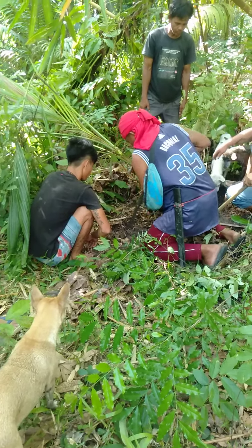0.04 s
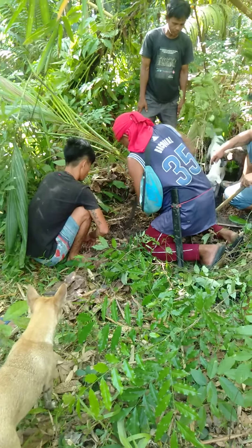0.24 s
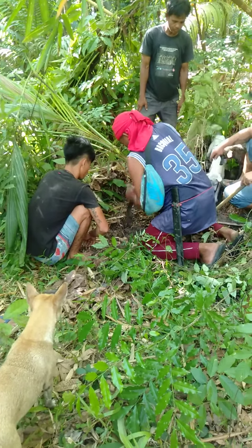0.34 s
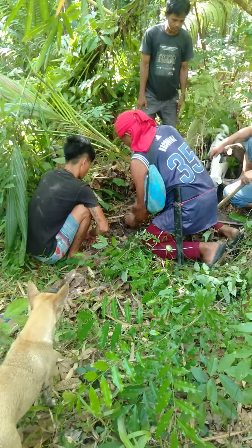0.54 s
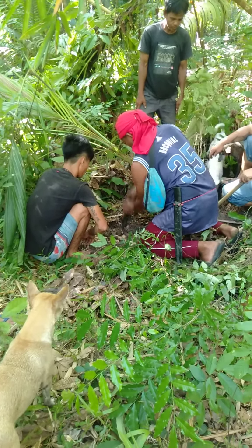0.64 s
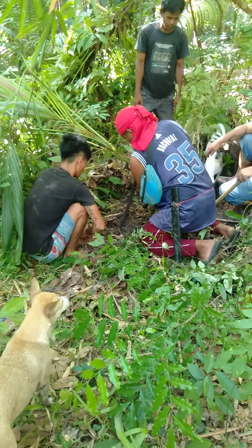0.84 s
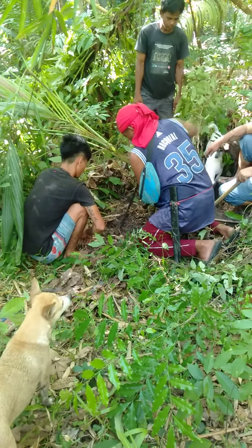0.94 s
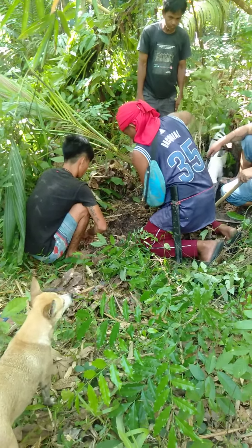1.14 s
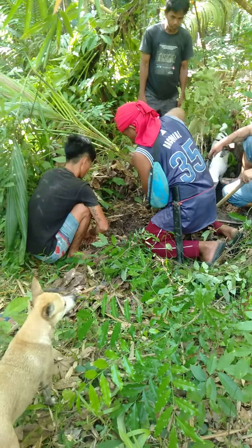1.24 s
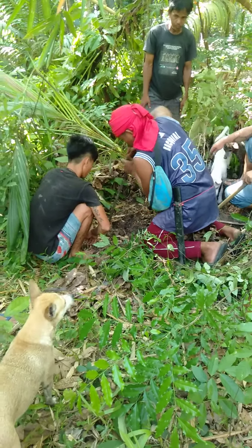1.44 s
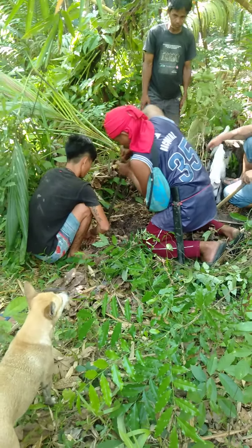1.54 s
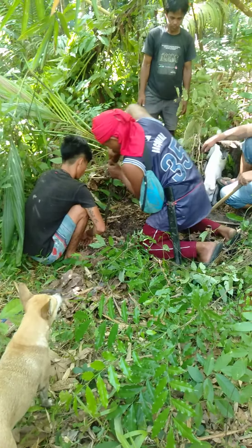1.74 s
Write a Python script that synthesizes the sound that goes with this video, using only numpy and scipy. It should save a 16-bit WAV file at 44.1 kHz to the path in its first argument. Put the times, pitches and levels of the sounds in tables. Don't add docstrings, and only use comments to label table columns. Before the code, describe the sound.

A dog gives one loud falling whine, then a small gulped yip, in a quiet forest.

```python
import sys
import numpy as np
from scipy import signal
from scipy.fft import rfft, irfft, next_fast_len
from scipy.io import wavfile
from scipy.ndimage import uniform_filter1d, map_coordinates

SR = 44100
rng = np.random.default_rng(int(sys.argv[2]) if len(sys.argv) > 2 else 0)


def dump_mix(stems):
    frames = np.atleast_2d(stems).T
    limited = np.clip(frames, -1, 1)
    pcm = np.round(limited * 32767).astype(np.int16)
    wavfile.write(sys.argv[1], SR, pcm)


def magnitude_from_level(level_db):
    exponent = np.asarray(level_db, float) / 20
    return 10 ** exponent


N = 79380

# frequency in Hz, gain in dB.
HISS_HZ_DB = [(300, 1), (1100, 1.5), (2000, 0), (2800, -7.5), (4600, -10), (7000, -5.5), (9000, -16.5),
              (15800, -12)]
RUMBLE_HZ_DB = [(12, -16.5), (20, 8.5), (43, 1), (81, 9), (125, 1), (238, -12), (283, -22.5), (330, -14),
                (430, -56.5), (730, -120)]

# time in seconds, pitch in Hz, level in dB, octave overtone in dB.
FAINT_WHISTLES = [
    [(0, 6170, -67, -26), (.01, 6440, -53, -14), (.02, 6400, -85, -20)],
    [(1.459, 6400, -79, -23), (1.464, 6420, -59, -21), (1.482, 6540, -52, -25), (1.506, 6390, -44.5, -48),
     (1.536, 6410, -43.5, -40), (1.555, 6370, -51, -18.5), (1.6, 6374, -51, -21), (1.642, 6280, -60, -6),
     (1.666, 6440, -45.5, -14.5), (1.685, 6110, -68, -27)],
]
FRAMING_WHISTLES = [
    [(.197, 6400, -84, -6), (.204, 6480, -38.5, -29), (.21, 6520, -51, -63.5), (.221, 6650, -34, -52),
     (.243, 6730, -38, -50.5), (.256, 6640, -44.5, -26.5), (.285, 6680, -79.5, -26),
     (.305, 6700, -67, -42.5), (.36, 6700, -60.5, -27)],
    [(.853, 6560, -100, -40), (.864, 6570, -44.5, -49), (.871, 6633, -33, -51), (.881, 6410, -48.5, -57),
     (.889, 6600, -79, -44)],
]
BLIP_WHISTLE = [(1.245, 6040, -67, -18), (1.26, 6070, -55, -26), (1.277, 6040, -48.5, -19.5),
                (1.286, 6050, -64, -1), (1.298, 6240, -62, -3), (1.315, 6340, -80, -15)]
# time in seconds, pitch in Hz, level in dB, sum tone in dB.
UPPER_WHISTLE = [(1.248, 8380, -85, 6), (1.258, 8300, -67, 12), (1.272, 8100, -61, 2),
                 (1.29, 7900, -83, -5)]

# time in seconds, length in
# seconds, level in dB, centre in Hz, width in Hz.
RUSTLES = [(0.535, 0.0028, -64.5, 9000, 7000), (0.548, 0.0034, -52, 6200, 9800),
           (0.685, 0.0032, -56, 7300, 3500), (0.692, 0.005, -61.5, 7100, 2930),
           (0.7, 0.02, -66.5, 6600, 2500), (0.253, 0.016, -51.5, 6950, 990),
           (0.853, 0.013, -48.5, 3370, 460), (0.85, 0.028, -49, 2740, 1600),
           (0.862, 0.049, -59.5, 6240, 3400), (.86, 0.035, -66, 14740, 2500), (1.032, 0.022, -55, 232, 50),
           (0.17, 0.042, -64, 150, 49.9), (0.315, 0.014, -58, 2100, 1000),
           (0.358, 0.018, -53.5, 2300, 1287), (0.52, 0.012, -61, 1500, 498),
           (1.047, 0.055, -69.5, 3540, 1800), (1.222, 0.054, -58, 1350, 1460),
           (1.224, 0.05, -63.5, 3250, 875), (1.238, 0.019, -55.5, 2200, 800),
           (1.198, 0.021, -59, 1060, 600), (1.29, 0.043, -71, 3000, 2000), (1.341, 0.03, -67, 3330, 560),
           (1.351, 0.037, -63.5, 3350, 2300), (1.652, .035, -64.5, 1106, 85), (1.665, .03, -62, 1760, 1850),
           (1.5, .06, -67, 1850, 200), (1.268, .014, -71, 3980, 200), (1.718, 0.014, -59.5, 6100, 5900),
           (1.723, 0.016, -61.5, 3880, 1800), (1.774, 0.015, -61.5, 1680, 700)]

# centre in Hz, width in Hz, level in dB.
THROAT_RESONANCES = [(484, 100, -5.5), (700, 226, -4.5), (979.3, 119, -3), (1136, 298, 0.5),
                     (1703, 756, -3.5), (2003, 505, 0), (2691, 437, -8), (3362, 530, -18.5),
                     (3825, 280, -19.5), (4400, 83, -45)]
# frequency in Hz, gain in dB.
NOSE_HZ_DB = [(4600, -8.5), (5000, -2.5), (5400, -3), (5800, -0.5), (6700, -2), (7600, -12), (9000, -27),
              (11000, -40)]
HAZE_HZ_DB = [(4500, -20.5), (7000, 5.5), (10000, -13.5), (13000, -6.5), (15500, -1)]

# time in seconds, pitch in Hz.
HOLD_PITCH = [(.225, 1115), (.25, 1198), (.295, 1254), (.33, 1150), (.365, 1083), (.45, 1078), (.5, 1061),
              (.55, 1027), (.6, 1015)]
FALL_PITCH = [(.615, 1003), (.635, 950.4), (.668, 928.2), (.682, 897), (.72, 865.2), (.742, 845),
              (.765, 833.5), (.8, 836.6), (.827, 829.3)]
BREAK_PITCH = [(.838, 790.4), (0.848, 756), (0.856, 681), (0.864, 585), (0.873, 562.7)]
# time in seconds, effort in dB, mouth opening (octave and up) in dB,
# brightness (higher overtones) in dB, half-pitch share in dB.
HOLD_EFFORT = [(0.23, -67, -30, -21.5, -70), (0.251, -28.5, -13, -6, -81), (.3, -25, -19, -16, -70),
               (0.324, -24, -19, 7, -74.5), (0.359, -27, -10.5, 3, -72), (0.374, -34.5, 7.5, -5.5, -79.5),
               (0.422, -30.5, 4, -5.5, -17.5), (0.509, -34.5, 4, -3, -26), (0.535, -27.5, 0.5, -10.5, -18)]
FALL_EFFORT = [(0.617, -24, -5, -9, -30.5), (0.641, -31.5, 5, -0.5, -71.5), (0.669, -33.5, 5.5, -4, -70),
               (0.702, -29.5, 3, 0.5, -76.5), (.718, -37, 8, -3.5, -68), (0.733, -41.5, 12.5, -6.5, -79),
               (.78, -37.5, 5, -0.5, -72.5), (0.831, -35.5, -3.5, 4.5, -65)]
BREAK_EFFORT = [(0.848, -26.5, -9, -11, -66), (0.856, -29.5, -4, -20, -64), (.864, -43, 5, -25, -68),
                (0.873, -58.5, 11, -15, -60), (0.879, -99, 17, -11, -52)]
# time in seconds, fourth overtone lift in dB, sheen of higher ones in dB,
# fifth overtone lift in dB.
WHINE_TONGUE = [(.26, 0.5, -46.5, 0), (.3, 0, -46, -5), (.33, -0.5, -36.5, 2), (.36, 4, -38.5, -2),
                (.385, 0.5, -30.5, -20), (.42, 1.5, -33, -2.5), (.5, -6, -34.5, 0.5),
                (.53, 7, -44.5, -11.5), (.61, -2.5, -47.5, -15), (.65, -1, -36, -5), (.68, -6, -35.5, -1),
                (.715, -6, -38.5, -8), (.73, 3.5, -26.5, -8), (.77, 2, -25, -2.5), (.82, 1, -30, -1),
                (.838, 9.5, -31.5, -3), (.848, 1, -58, -5)]

# time in seconds, pitch in Hz.
YIP_PITCH = [(1.19, 437.8), (1.21, 463.2), (1.228, 536), (1.246, 684), (1.26, 700)]
# time in seconds, effort in dB, mouth opening in dB, brightness in dB, half-pitch in dB.
YIP_EFFORT = [(1.187, -81, -8, -4, -44), (1.198, -46.5, -7, -51, -21), (1.217, -54.5, -2, -40, -17),
              (1.229, -48, 8.5, -27, -50), (1.245, -41.5, -22, 3, -47), (1.258, -91, -32, -14, -47)]

# delay in seconds, level in dB.
NEAR_ECHOES = [(.0125, -24), (.027, -30)]
# frequency in Hz, decay by 60 dB in seconds.
TRUNKS_HZ_T60_S = [(600, 0.22), (1000, 0.92), (1700, 0.64), (2500, 0.83), (3500, 1), (7000, 0.79),
                   (14000, 0.3)]
# frequency in Hz, gain in dB.
BANK_HZ_DB = [(750, -25), (1000, -8), (1700, -3), (2500, 0), (3300, -14), (6500, -10)]


def unit(x):
    return x / np.sqrt(np.mean(x ** 2) + 1e-20)


def along(points, hz):
    f, v = np.transpose(points)
    return np.interp(np.log(hz + 1), np.log(f + 1), v)


def curves(rows):
    s, *cols = np.transpose(rows)
    return [np.interp(np.arange(N) / SR, s, c) for c in cols]


def during(rows):
    t = np.arange(N) / SR
    start_s, end_s = rows[0][0], rows[-1][0]
    already_on = (start_s <= 0) * (t < .01)
    return np.clip(np.minimum(t - start_s, end_s - t) * 500 + already_on, 0, 1)


def wobble(per_s):
    return map_coordinates(rng.standard_normal(N // 40), [np.arange(N) * per_s / SR])


def coloured(gain):
    m = next_fast_len(N)
    spectrum = rfft(rng.standard_normal(m)) * gain(np.fft.rfftfreq(m, 1 / SR))
    return unit(irfft(spectrum, m)[:N])


def delayed(x, delay_s):
    return np.pad(x, (round(delay_s * SR), 0))[:N]


def forest():
    hiss = magnitude_from_level(-63 + 0.17 * wobble(4.6)) * coloured(lambda f: magnitude_from_level(along(HISS_HZ_DB, f)))
    rumble = magnitude_from_level(-64.5 + 0.85 * wobble(14)) * coloured(lambda f: magnitude_from_level(along(RUMBLE_HZ_DB, f)))
    return hiss + rumble


def whistle(rows, partner_hz=None):
    hz, level_db, over_db = curves(rows)
    phase = 2 * np.pi * np.cumsum(hz * (1 + .0025 * wobble(150))) / SR
    other = phase if partner_hz is None else 2 * np.pi * partner_hz * np.arange(N) / SR
    tone = np.sin(phase) + magnitude_from_level(over_db) * np.sin(phase + other)
    return np.sqrt(2) * during(rows) * magnitude_from_level(level_db + 1.1 * wobble(90)) * tone


def whistles():
    plain = sum(whistle(rows) for rows in FAINT_WHISTLES + FRAMING_WHISTLES + [BLIP_WHISTLE])
    return plain + whistle(UPPER_WHISTLE, partner_hz=6050)


def rustle(start_s, length_s, level_db, centre_hz, width_hz):
    t = np.arange(N) / SR
    grain = magnitude_from_level(1.0 * wobble(400) * (centre_hz > 400))
    envelope = np.exp(-(2 * (t - start_s) / length_s) ** 4)
    noise = coloured(lambda f: 1 / (1 + (2 * (f - centre_hz) / width_hz) ** 4))
    return magnitude_from_level(level_db) * np.sqrt(length_s * SR / N) * unit(grain * envelope * noise)


def rustles():
    return sum(rustle(*row) for row in RUSTLES)


def throat(hz):
    return sum(magnitude_from_level(db) / (1 + (2 * (hz - c) / w) ** 2) ** 1.432 for c, w, db in THROAT_RESONANCES)


def voice(pitch, effort, count, tongue):
    hz = uniform_filter1d(curves(pitch)[0], size=300) * (1 + 0.0016 * wobble(60))
    effort_db, mouth_db, bright_db, half_db = curves(effort)
    fourth_db, sheen_db, fifth_db = curves(tongue)
    phase = 2 * np.pi * np.cumsum(hz) / SR

    tone = 0
    for k in np.r_[np.arange(1, count + 1), np.arange(1, 4) + .5]:
        lift_db = mouth_db * (k > 1) + bright_db * (k > 2) / (1 + (k > 4)) + fourth_db * (k == 4)
        lift_db = lift_db + half_db * (k % 1 > 0) - 18 * (k == 1.5)
        ripple_db = .9 * wobble(130)
        shimmer_db = (.7 + 1.1 * np.clip(k - 2, 0, 5)) * wobble(35)
        tone = tone + throat(k * hz) * magnitude_from_level(lift_db + ripple_db + shimmer_db) * np.sin(k * phase)

    sheen = 0
    for k in range(count + 1, 11):
        nose_db = sheen_db + fifth_db * (k == 5) + along(NOSE_HZ_DB, k * hz)
        sheen = sheen + magnitude_from_level(nose_db + 5.5 * wobble(25)) * np.sin(k * phase)

    breath = magnitude_from_level(-35.5) * coloured(throat)
    haze_db = -37.5 + 0.41 * mouth_db + 2.5 * wobble(25)
    haze = magnitude_from_level(haze_db) * coloured(lambda f: magnitude_from_level(along(HAZE_HZ_DB, f)))
    return during(effort) * magnitude_from_level(effort_db) * (np.sqrt(2) * (tone + sheen) + breath + haze)


def whine():
    pitch = HOLD_PITCH + FALL_PITCH + BREAK_PITCH
    effort = HOLD_EFFORT + FALL_EFFORT + BREAK_EFFORT
    return voice(pitch, effort, count=4, tongue=WHINE_TONGUE)


def yip():
    return voice(YIP_PITCH, YIP_EFFORT, count=8, tongue=[(0, 0, -120, 0)])


def trunks(x):
    near = sum(magnitude_from_level(db) * delayed(x, delay_s) for delay_s, db in NEAR_ECHOES)
    hz, t, z = signal.stft(rng.standard_normal(SR), SR, nperseg=256)
    decay = magnitude_from_level(-60 * t / along(TRUNKS_HZ_T60_S, hz)[:, None])
    tail = signal.istft(z * decay, SR, nperseg=256)[1]
    far = signal.fftconvolve(delayed(x, 0.013), tail / np.linalg.norm(tail))[:N]
    bank_gain = magnitude_from_level(-25 + along(BANK_HZ_DB, np.fft.rfftfreq(N, 1 / SR)))
    bank = irfft(rfft(delayed(x, .118)) * bank_gain, N)
    return near + magnitude_from_level(-21) * far + bank


def scene():
    near = whistles() + rustles() + whine() + yip()
    return (near + trunks(near) + forest())[None]


def band_limit(x):
    return signal.sosfilt(signal.butter(12, 15970, fs=SR, output="sos"), x)


def record(dry):
    return band_limit(dry)


dry = scene()
out = record(dry)
dump_mix(out)
```